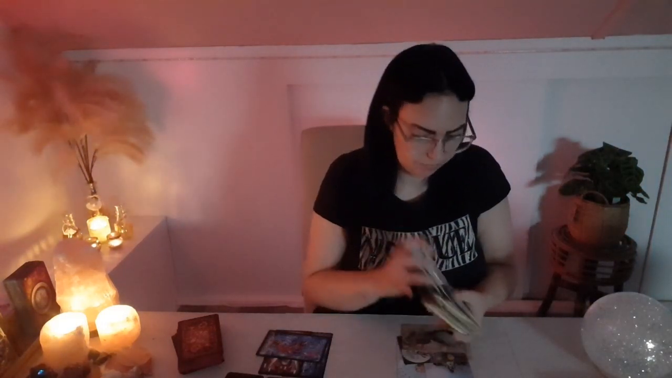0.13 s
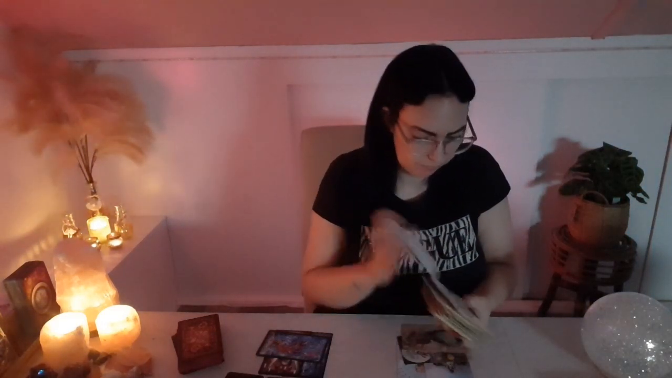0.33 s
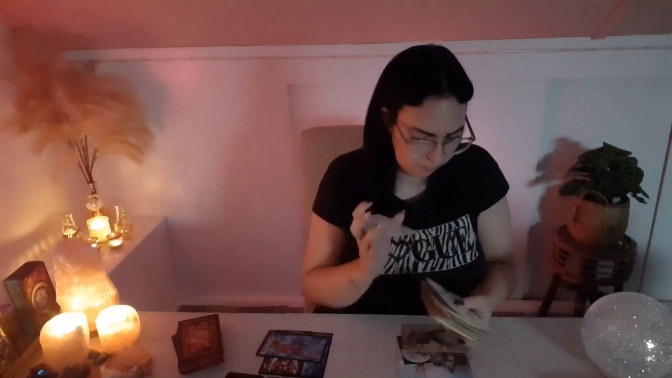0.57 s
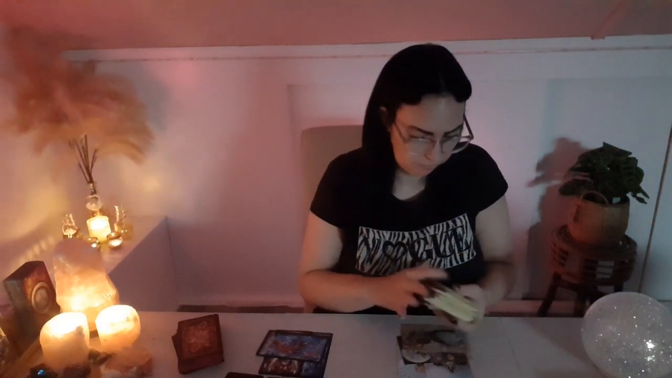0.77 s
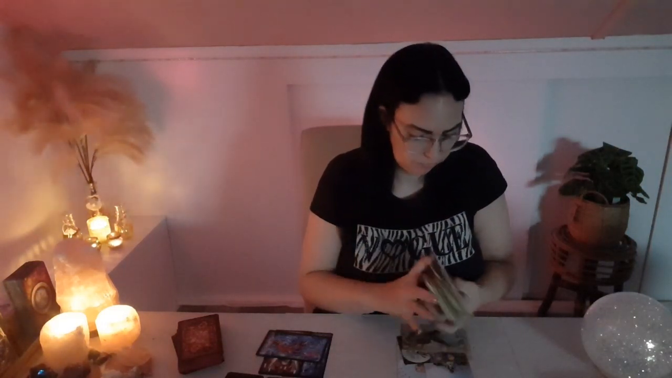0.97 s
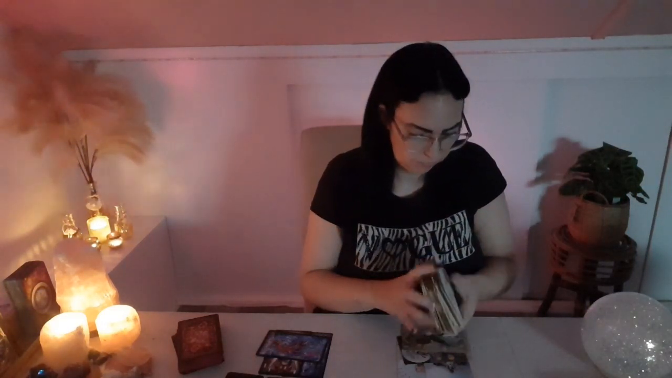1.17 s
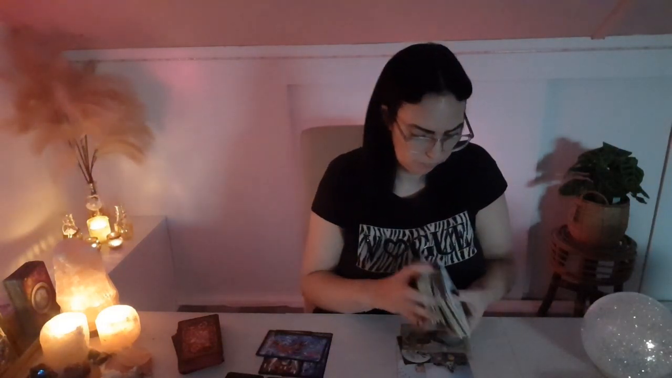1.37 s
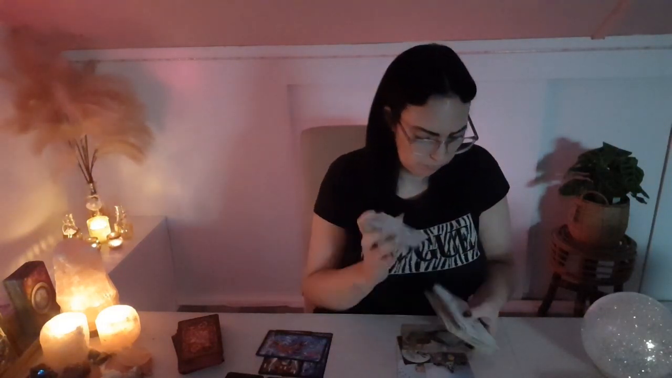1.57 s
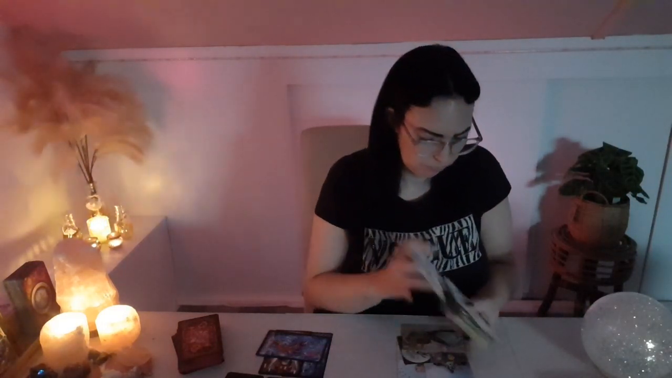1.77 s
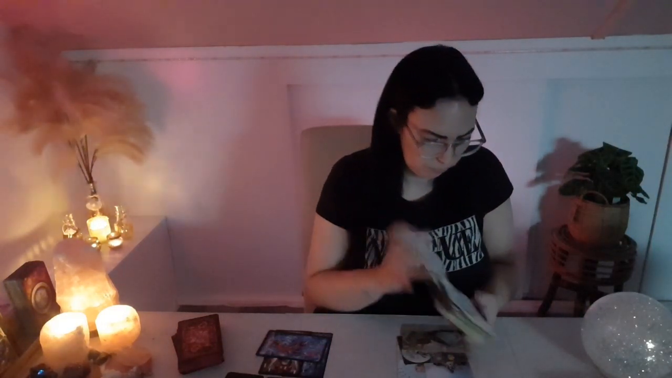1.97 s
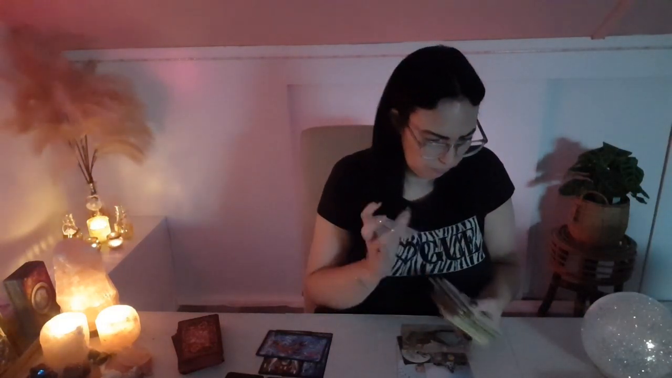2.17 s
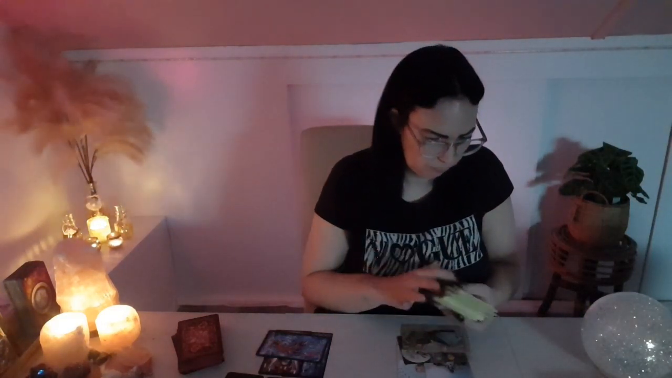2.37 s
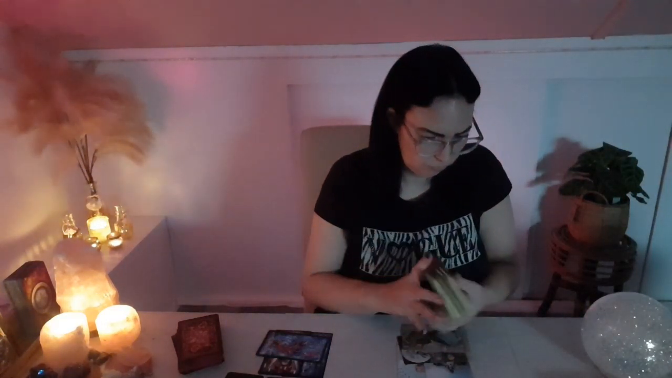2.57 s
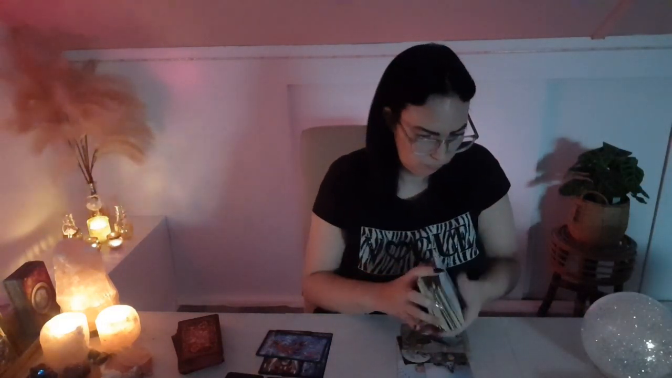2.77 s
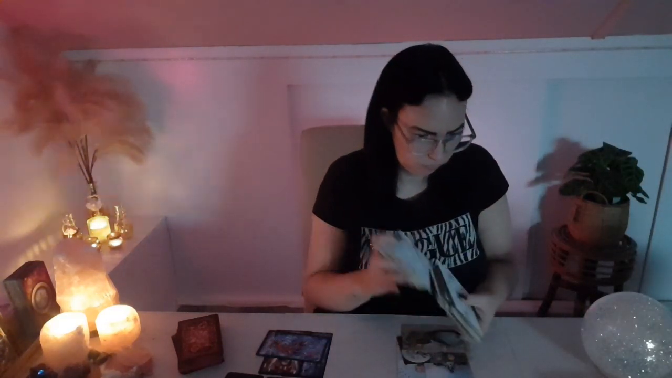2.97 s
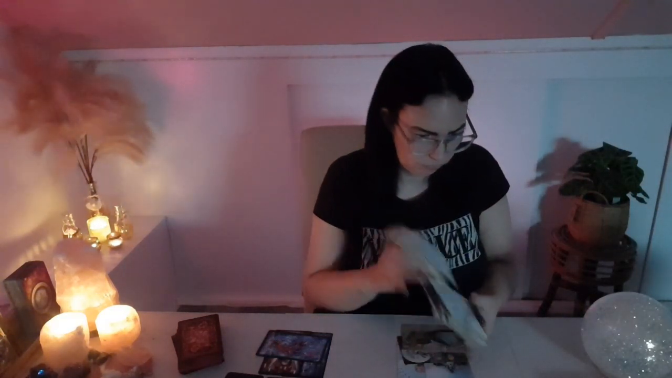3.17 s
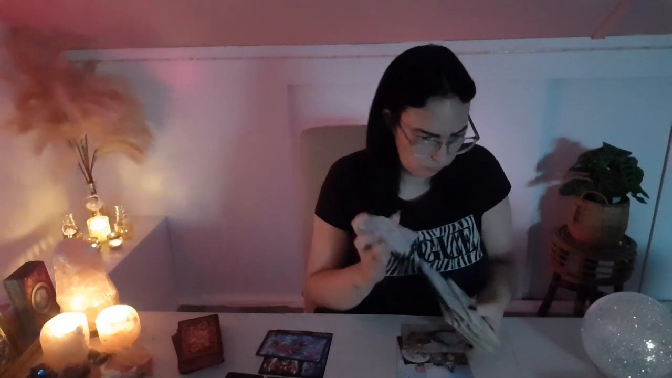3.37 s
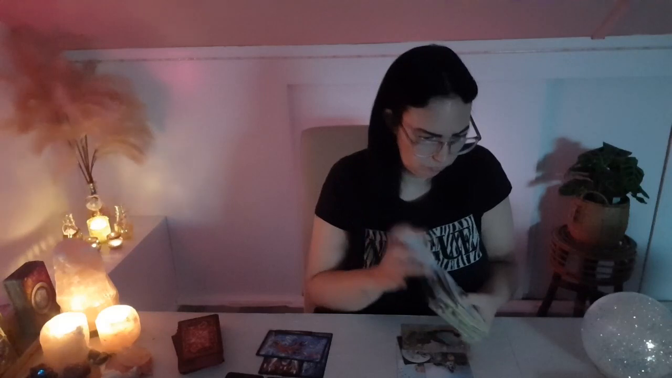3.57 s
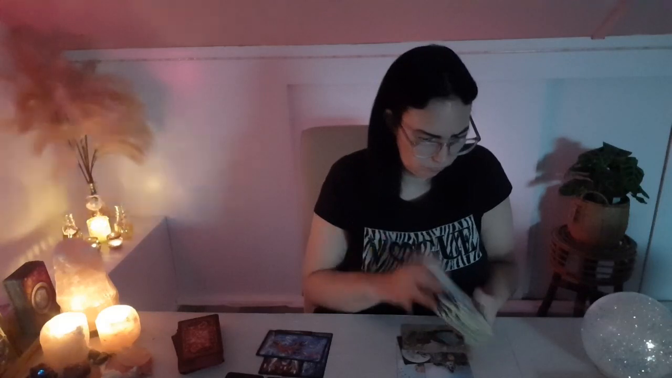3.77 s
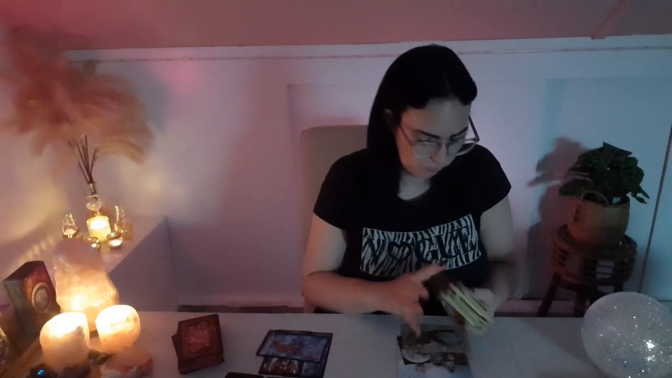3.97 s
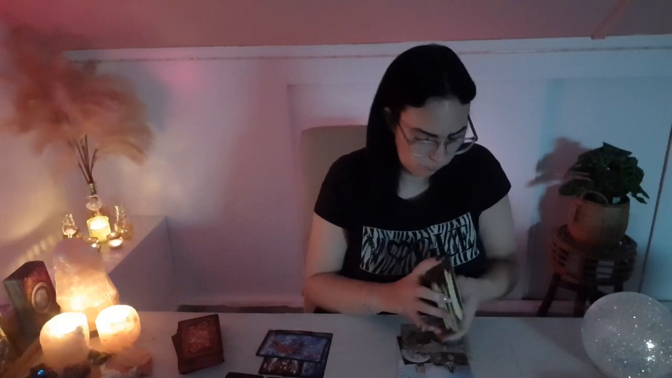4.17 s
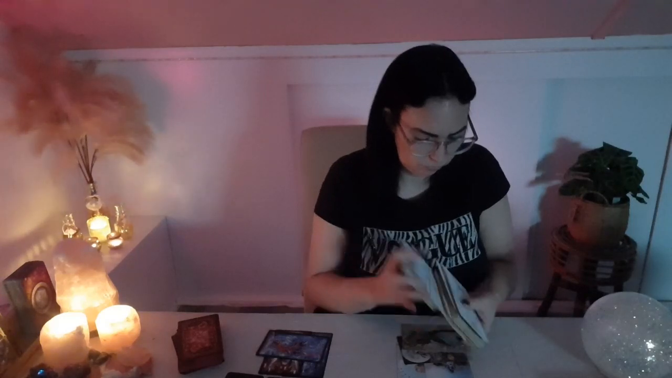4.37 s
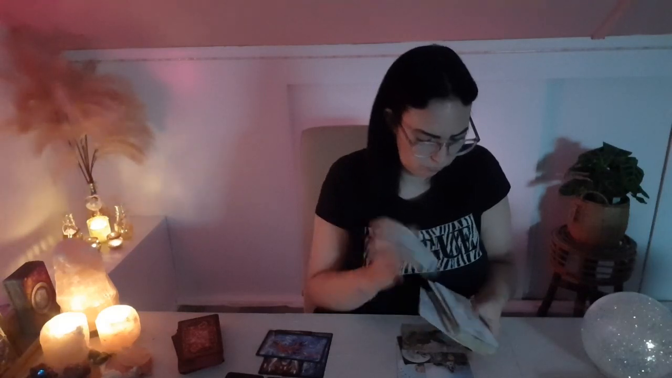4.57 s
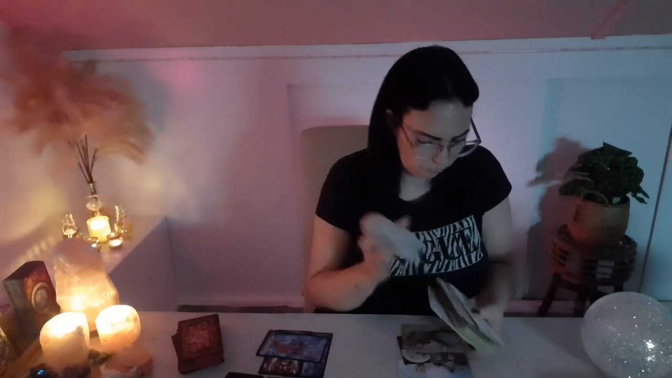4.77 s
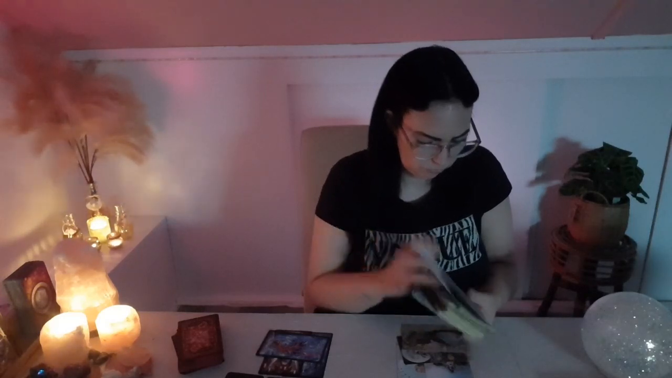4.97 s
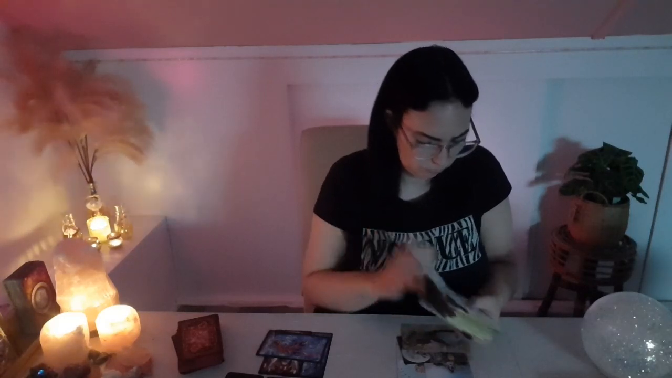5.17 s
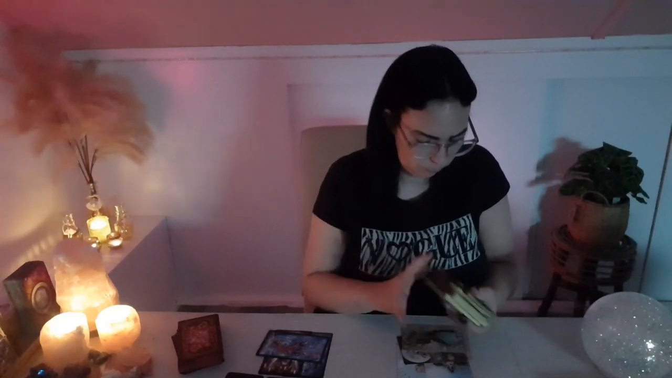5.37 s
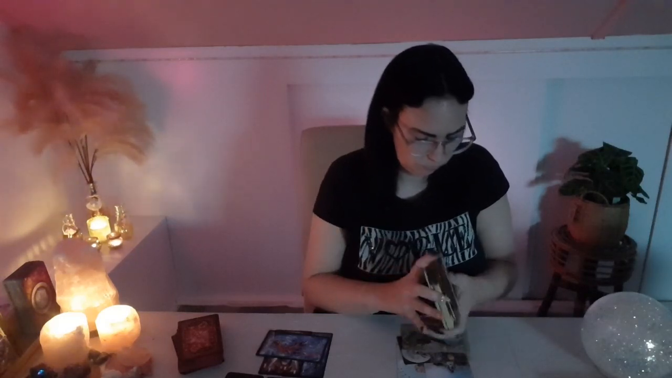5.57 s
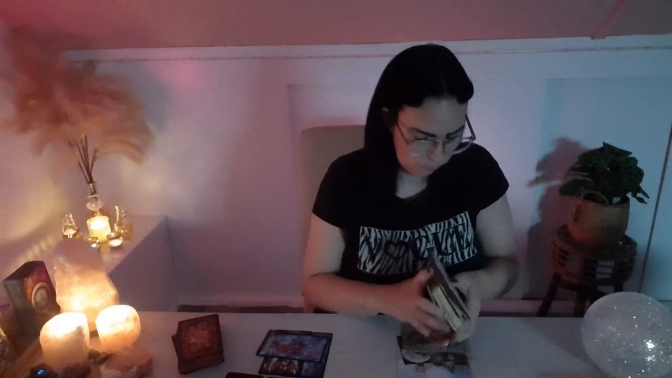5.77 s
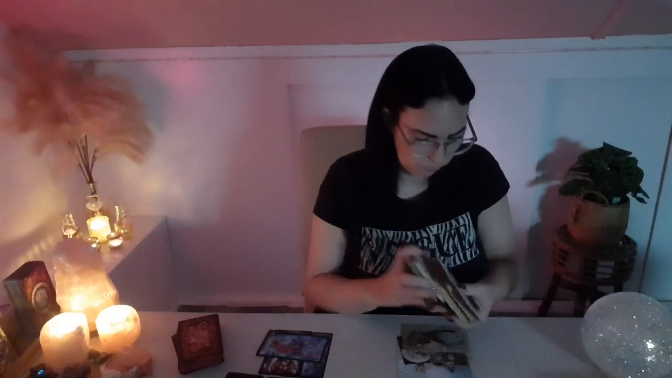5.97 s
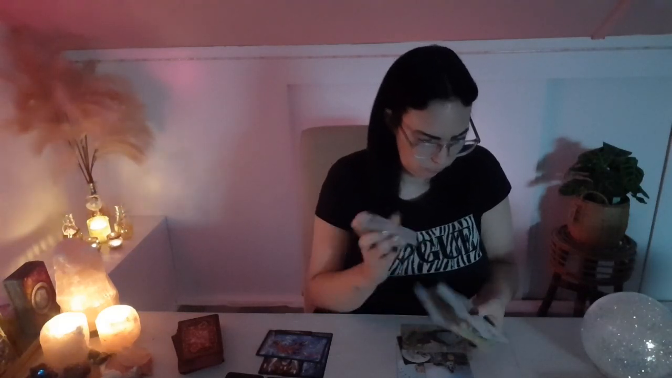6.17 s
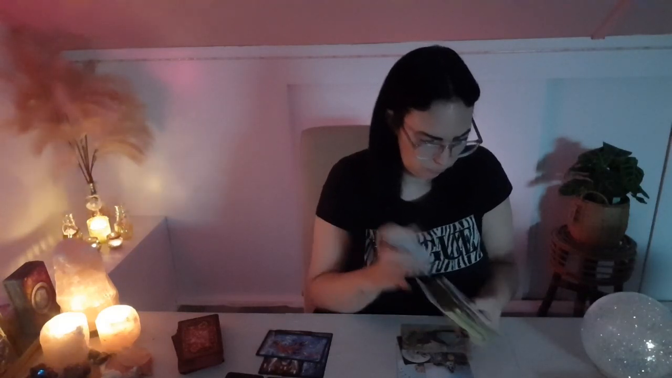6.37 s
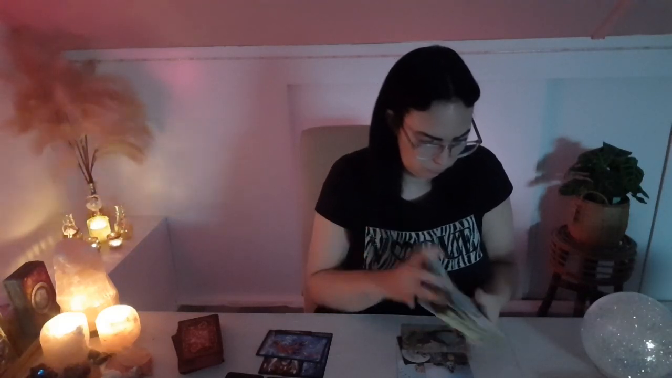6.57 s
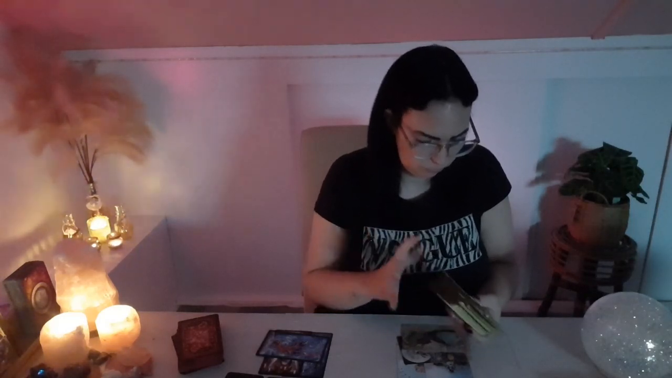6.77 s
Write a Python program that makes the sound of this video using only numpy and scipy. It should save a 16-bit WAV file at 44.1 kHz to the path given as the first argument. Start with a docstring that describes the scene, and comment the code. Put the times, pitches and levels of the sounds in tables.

```python
"""In a small, bare room a deck of large cards is shuffled overhand above a table.
Packets scrape off the deck (stick-slip catches and hiss) and slap down on the other hand (noise snaps, damped thuds).
Between rounds the fingers ease the deck apart with smooth hisses; flat landings make the cupped palm ring.
The table top and the walls throw every sound back to a pair of microphones, over a faint rumble, hiss and hum."""
import sys
import numpy as np
from scipy import signal
from scipy.fft import rfft, irfft, next_fast_len
from scipy.io import wavfile

SR = 44100
rng = np.random.default_rng(int(sys.argv[2]) if len(sys.argv) > 2 else 0)


def wrap_up_sound(samples):
    """Save the sound to the file named by the first command line argument, as 16-bit audio."""
    columns = np.atleast_2d(samples).T
    # keep every value between -1 and 1, then stretch to whole-number steps
    tamed = np.clip(columns, -1, 1)
    steps = np.round(tamed * 32767).astype(np.int16)
    wavfile.write(sys.argv[1], SR, steps)


N = 300321  # samples


def amp(db):
    """A level in decibels is twenty times the logarithm of the amplitude ratio; returns that ratio."""
    return 10 ** (np.asarray(db) / 20)


def evened(x):
    """Mean power sets the level of a sound: scales it to an rms of one."""
    return x / np.sqrt(np.mean(x ** 2) + 1e-20)


def read(points, hz):
    """Pitch follows the logarithm of frequency, so a table is interpolated on a logarithmic axis."""
    f, value = np.transpose(points)
    return np.interp(np.log(hz + 1), np.log(f + 1), value)


def add(mix, s, sound):
    """Superposition: sound pressures add, here from time s on."""
    part = mix[max(round(s * SR), 0):][:len(sound)]
    part += sound[:len(part)]


def colour(tone, tilt=0, size=2048):
    """Minimum phase: the log spectrum fixes the phase of a causal response, here of energy one."""
    hz = abs(np.fft.fftfreq(size, 1 / SR))
    # the tilt, in dB per octave, pivots at 3 kHz and stays level below 700 Hz
    octaves = np.log2(np.maximum(hz, 700) / 3000)
    log_gain = np.log(amp(read(tone, hz) + tilt * octaves))
    spectrum = np.exp(np.conj(signal.hilbert(log_gain)))
    response = np.fft.ifft(spectrum).real[:size // 2]
    return response / np.linalg.norm(response)


def tinted(x, tone, tilt=0):
    """Linear filtering: convolution with an impulse response gives a sound its spectrum."""
    return signal.fftconvolve(x, colour(tone, tilt))[:len(x)]


def pair(z, hz):
    """Coherence: two microphones hear most alike near 350 Hz, less in deep bass, hardly in the treble."""
    # left-right likeness of the field: hz, likeness
    likeness = [(100, 0.34), (350, 0.74), (700, 0.35), (1400, 0.03), (16000, 0.029)]
    same = np.clip(read(likeness, hz), -1, 1)[:, None]
    left = same * z[1] + np.sqrt(1 - same ** 2) * z[0]
    return np.array([left, z[1]])


def air(air_db=-73, hum_db=-77, hum_hz=78):
    """Stationary noise: shaped room rumble and hiss, with narrow-band modulation of a low hum."""
    # spectrum of the rumble and hiss, relative levels: hz, level_db
    air_tone = [(20, -15), (45, 8), (80, 5.5), (130, 0), (300, -4.5), (700, -7), (2000, -19), (7000, -15.5),
                (16000, -14.5)]
    hz, _, z = signal.stft(rng.standard_normal((2, N)), SR, nperseg=4096)
    shaped = pair(z, hz) * amp(read(air_tone, hz))[:, None]
    wash = signal.istft(shaped, SR, nperseg=4096)[1][:, :N]
    # noise below 6 Hz wavers the strength and phase of the hum
    slow = signal.butter(2, 6, fs=SR, output="sos")
    waver = evened(signal.sosfilt(slow, rng.standard_normal((2, N))))
    carrier = np.exp(2j * np.pi * hum_hz * np.arange(N) / SR)
    hum = ((1 + .5 * (waver[0] + 1j * waver[1])) * carrier).real
    return amp(air_db) * evened(wash) + amp(hum_db) * evened(hum)


def friction(count, catches_per_s, spread_db, smooth):
    """Stick-slip of paper on paper: tiny random catches of uneven size over a smooth hiss."""
    hiss, sign = rng.standard_normal((2, count))
    size = amp(spread_db * np.minimum(rng.exponential(1, count), 4))
    catches = sign * size * (rng.random(count) < catches_per_s / SR)
    return evened(evened(catches) + smooth * hiss)


def grip(t, step_s, count=300):
    """Friction between cards is never steady: it drifts to a new random value every step."""
    return evened(np.interp(t / step_s, np.arange(count), rng.uniform(-0.9, 1, count)))


def scrapes(touch_s=.011, release_s=0.012, bite_db=7, bite_s=0.0062, grip_db=2.0, grip_s=0.00713):
    """Friction-driven vibration: a packet touches, bites, rubs harder and slides free while its cards flex."""
    # a packet scrapes over the deck, relative levels:
    # start_s, rise_s, fall_s, level_db, brightness_db_per_octave, flex_db
    strokes = [ (0.000, 0.001, 0.005, -58.5, -2, -3.5), (0.139, 0.032, 0.085, -46.5, 0, -9),
               (0.419, 0.014, 0.038, -43, .5, -8), (0.474, 0.033, 0.073, -45.5, -.5, -5),
               (0.560, 0.036, .015, -43.5, 0, -25), (0.737, 0.0041, 0.067, -46.5, -2, -7),
               (1.562, 0.0033, 0.013, -38.5, -5, -33), (1.782, 0.019, 0.069, -36.5, -1.5, -17.5),
               (2.095, 0.0055, .025, -45.5, 1.5, -18), (2.124, 0.017, .008, -40.5, 3, -18.5),
               (2.350, 0.053, 0.027, -48.5, -1.5, -3), (3.293, 0.024, 0.074, -40.5, -2, -21.5),
               (3.570, 0.0016, 0.015, -41, 2.5, -19), (3.603, 0.033, 0.015, -41, 0, -13.5),
               (3.830, 0.0027, 0.012, -50, 0.5, -13), (3.874, 0.0053, 0.034, -51.5, 0.5, -7),
               (4.212, 0.0086, 0.047, -50, 1, -19.5), (4.514, 0.0046, 0.022, -51.5, -3, -9),
               (4.715, 0.0066, 0.014, -40, 2, -18), (4.748, 0.041, 0.017, -45, -.5, -8),
               (4.990, 0.0022, .028, -48.5, 1, -16.5), (5.026, 0.01, 0.0089, -40.5, 4.5, -24),
               (5.084, 0.0045, 0.019, -50, -2.5, -1.5), (5.254, 0.0094, 0.0097, -43, -1.5, -5),
               (5.282, 0.015, 0.033, -46, -1.5, -8.5), (6.125, 0.015, 0.036, -47, 4, -15.5),
               (6.375, 0.028, 0.097, -38.5, -1, -7), (6.650, 0.015, 0.09, -40, -1, -9)]
    # spectrum of the rubbing edges, relative levels: hz, level_db
    scrape_tone = [(100, -39.5), (400, -12), (800, -2), (1150, -4.5), (1500, 1), (2100, 0.5), (2900, -1),
                   (4200, 2), (7000, -3.5), (12000, -0.5), (16000, -9.5)]
    # spectrum of the flexing cards, relative levels: hz, level_db
    flex_tone = [(40, -31), (90, -10.5), (180, -10), (300, -1.5), (480, 1), (700, 0), (1000, -7.5),
                 (2000, -29)]
    out, t = np.zeros(N), np.arange(SR // 5) / SR - touch_s
    for s, rise, fall, db, tilt, flex_db in strokes:
        # light touch, start, hardest rub, easing off, free
        times = [-touch_s, 0, rise, rise + fall, rise + fall + release_s]
        stroke_db = np.interp(t, times, [-23, -5.5, 0, -11.5, -60])
        catch_db = bite_db * np.exp(-abs(t) / bite_s)  # the edges catch at the start
        level = amp(db + stroke_db + catch_db + grip_db * grip(t, grip_s))
        rub = level * friction(len(t), catches_per_s=1500, spread_db=4.5, smooth=.55)
        flex = tinted(level * rng.standard_normal(len(t)), flex_tone)
        add(out, s - touch_s, tinted(rub, scrape_tone, tilt) + amp(flex_db) * flex)
    return out


def slaps(snap_s=0.0011, snap_db=23, thud_db=24, straggle_s=0.0021, straggle_db=-6, beam_db=7):
    """Impact: edges snap down as a short noise burst, the palm thuds; returns sound all round and ahead."""
    # a card edge or a packet lands, relative levels:
    # start_s, snap_db, brightness_db_per_octave, thud_db, thud_hz
    landings = [ (0.143, -38.5, -.5, -62, 590), (0.241, -51.5, -7, -54.5, 666), (0.5505, -50, -6, -56, 637),
                (0.557, -28, -.5, -38.5, 594), (0.740, -38.5, -2.5, -44, 600), (1.563, -41.5, -6, -56, 600),
                (1.7689, -39.5, -3.5, -72, 930), (1.7915, -32.5, 0, -67, 594), (1.822, -38.5, 12, -59, 590),
                (1.865, -44.5, -11, -48.5, 384), (2.166, -51.5, -10, -45.5, 355),
                (2.346, -48, 7, -44.5, 294), (2.387, -52, 1, -77, 252), (3.0701, -46, -3.5, -44.5, 430),
                (3.2854, -35, 1.5, -40, 870), (3.322, -47, 3, -50, 663), (3.41, -46.5, -5, -70, 800),
                (3.6493, -37.5, -4, -40, 480), (3.8727, -45.5, -2.5, -55, 610),
                (4.2143, -46, 0.5, -61.5, 510), (4.5167, -35, 3, -49, 720), (4.7428, -34.5, -0.5, -47, 627),
                (4.7955, -43.5, -4.5, -49, 507), (5.039, -48.5, -4.5, -49.5, 750),
                (5.083, -42.5, -1.5, -47.5, 553), (5.2611, -36, -1.5, -44.5, 310),
                (6.1588, -40.5, 0, -40.5, 486), (6.3795, -24.5, 1, -28, 616), (6.642, -36, -1, -53, 567),
                (6.653, -34.5, -2, -43.5, 535), (6.7266, -54, -16, -49, 625)]
    # spectrum of a snap, relative levels: hz, level_db
    snap_tone = [(30, -23), (130, -12.5), (400, -28), (1000, -10), (1600, -0.5), (2800, -0.5), (4300, 2),
                 (7000, 1), (12000, -0.5), (16000, -12)]
    around, ahead, t = np.zeros(N), np.zeros(N), np.arange(2048) / SR
    thud_cycles = .76  # sets how soon the thud dies away
    fade = np.exp(-t / snap_s)
    for s, db, tilt, low_db, hz in landings:
        edges = rfft(rng.standard_normal(len(t)) * fade)
        # many edges together cover all frequencies evenly
        edges = evened(irfft(edges / abs(edges)) * np.sqrt(fade))
        # loose cards trail behind the rest
        stragglers = evened(rng.standard_normal(len(t)) * np.exp(-t / straggle_s))
        snap = tinted(edges + amp(straggle_db) * stragglers, snap_tone, tilt)
        swell_and_decay = t * np.exp(-2 * t * hz / thud_cycles)
        thud = np.diff(np.sin(2 * np.pi * hz * t) * swell_and_decay, prepend=0)
        snap *= amp(db + snap_db) / np.linalg.norm(snap)
        thud *= amp(low_db + thud_db) / np.linalg.norm(thud)
        add(around, s, snap + thud)
        # flat cards beam the snap towards the microphones; the thud spreads evenly
        add(ahead, s, amp(beam_db) * snap + thud)
    return around, ahead


def glides(swell_db=14, ease=0.25, hiss_db=2, press_db=0, grip_db=2.0, grip_s=0.0168):
    """Sliding friction grows with speed: card faces hiss smoothly, and pressure brings out lower tones."""
    # cards glide as the deck is parted, relative levels, pressure as level of the lower tones:
    # fastest_s, speeding_up_s, slowing_down_s, level_db, pressure_db
    slides = [ (1.122, .085, .05, -53.5, -8), (1.225, .05, .15, -69, -16), (1.44, .05, .08, -59.5, -6.5),
              (1.525, 0.061, 0.071, -55.5, -11.5), (2.736, 0.095, 0.076, -56.5, -10.5),
              (2.90, 0.084, 0.086, -66.5, -10), (2.962, .025, 0.037, -51.5, -8.5),
              (3.045, 0.029, 0.041, -53, -4), (4.082, .012, .09, -68, -0.5), (4.19, .12, .07, -59, -11),
              (4.50, .21, .03, -57.5, -35), (5.575, 0.08, 0.14, -61, -13.5),
              (5.78, 0.092, 0.054, -59.5, -10), (5.845, .02, 0.11, -68, -7), (6.101, 0.25, 0.047, -70, -15)]
    # spectrum of the thin hiss, relative levels: hz, level_db
    glide_tone = [(300, -12.5), (1500, -24), (3000, -14.5), (4400, -4), (7500, -3.5), (12000, 0),
                  (16000, -9)]
    # spectrum of the lower tones, relative levels: hz, level_db
    press_tone = [(100, -11), (300, -31), (650, -6), (1100, -9), (1520, 2.5), (1750, -2.5), (2100, 2),
                  (2700, 4), (4000, -0.5), (8000, -57.5)]
    out = np.zeros(N)
    for s, rise, fall, db, pressure_db in slides:
        t = np.arange(0, rise + fall, 1 / SR)
        speed = np.interp(t, [0, rise, rise + fall], [0, 1, 0])
        level = amp(db + swell_db * (speed - 1) + grip_db * grip(t, grip_s))
        level = level * np.minimum(speed / ease, 1)  # fades to silence at the slow ends
        rub = level * friction(len(t), catches_per_s=900, spread_db=5, smooth=1.1)
        hiss = amp(hiss_db) * tinted(rub, glide_tone)
        add(out, s - rise, hiss + amp(press_db + pressure_db) * tinted(rub, press_tone))
    return out


def claps(ring_db=24):
    """Cavity resonance: a packet lands flat and the air in the cupped palm rings as a damped sine."""
    # ringing of the palm, relative levels: start_s, level_db, pitch_hz, t60_s
    hollows = [(1.5625, -48, 815, 0.03), (2.1680, -55.5, 374, 0.063), (6.3790, -27, 684.4, 0.13),
               (6.6535, -48, 592, 0.023)]
    out, t = np.zeros(N), np.arange(4096) / SR
    for s, db, hz, t60 in hollows:
        hollow = np.diff(np.sin(2 * np.pi * hz * t) * amp(-60 * t / t60), prepend=0)
        add(out, s, amp(db + ring_db) * hollow / np.linalg.norm(hollow))
    return out


def ring(x, modes):
    """Modal resonance: each mode adds a damped response to the sound that drives it."""
    out = x
    for hz, width, db in modes:
        b, a = signal.iirpeak(hz, hz / width, SR)
        out = out + amp(db) * signal.lfilter(b, a, x)
    return out


def near(x, direct_db=-9, right_lag_s=.00007, sway_s=0.00016):
    """Path lengths set arrival times: direct sound and first echoes shift a little as the hands move."""
    # first echoes, from the table top on: delay_s, left_gain, right_gain
    echoes = [(.0031, 0.57, 0.58), (.0037, 0.23, 0.13), (.0073, 0.22, 0.36), (.0092, 0.18, 0.19)]
    n, out = np.arange(N), np.zeros((2, N))
    poses = np.linspace(0, N, num=24)  # the hands drift between random poses
    for delay, left, right in [(0.00022, 0.98, 1)] + echoes:  # direct sound first
        path = np.interp(n, poses, rng.standard_normal(len(poses)))
        angle = np.interp(n, poses, rng.standard_normal(len(poses)))
        late = delay + sway_s * path
        for side, gain, lag in [(0, left, late), (1, right, late + right_lag_s * (1 + angle))]:
            source = n - np.round(lag * SR).astype(int)
            out[side] += gain * x[np.clip(source, 0, N - 1)]
    return amp(direct_db) * out


def wall_tail(build_s=0.0044, count=28000):
    """Reverberation: dense reflections build up, then decay exponentially at each band's own rate."""
    # reverberation time of the room: hz, t60_s
    decay = [(100, 0.37), (400, 0.27), (1000, 0.41), (2000, 0.38), (7000, 0.34), (16000, 0.23)]
    taps = rng.choice([-1., 1.], (2, count)) * (rng.random(count) < 9000 / SR)  # 9000 a second on average
    hz, t, z = signal.stft(taps, SR, nperseg=256)
    fading = pair(z, hz) * amp(-60 * t / read(decay, hz)[:, None])
    tail = signal.istft(fading, SR, nperseg=256)[1][:, :count]
    tail *= np.sqrt(1 - np.exp(-np.arange(count) / SR / build_s))
    return tail / np.linalg.norm(tail, axis=1, keepdims=True)


def room(x, tail_db=-2, count=5):
    """Impulse responses depend on source place: the moving cards cross-fade between several wall tails."""
    # standing waves between the walls and the table, relative levels: pitch_hz, width_hz, level_db
    standing_waves = [(152, 53, 3), (295, 21.5, 3.5), (378.7, 10, 5), (654, 31, -7.5)]
    place = np.arange(N) / SR * 60  # 60 places a second, taken in turn
    out = np.zeros((2, N))
    for k in range(count):
        distance = np.minimum(abs((place - k) % count - count / 2), 1)
        share = x * np.cos(np.pi / 2 * distance)
        out += signal.oaconvolve(share[None], wall_tail(), axes=1)[:, :N]
    return amp(tail_db) * ring(out, standing_waves)


def scene():
    """Superposition of direct, reflected and background sound from the cards in the room."""
    # the held deck rings briefly, relative levels: pitch_hz, width_hz, level_db
    deck = [(1487, 100, 3.5), (2020, 143, -3)]
    cards = scrapes() + glides() + claps()
    around, ahead = slaps()
    return near(ring(cards + ahead, deck)) + room(ring(cards + around, deck)) + air()


def record(dry):
    """Transducer response: the microphones dip in the treble, the right is louder, and the band is limited."""
    # microphone response: hz, level_db
    mic_tone = [(20, -5), (7900, 2), (8500, -10.5), (9500, -7.5), (11300, -2), (15800, 4), (16300, -41.5)]
    # balance of the two microphones: hz, left_minus_right_db
    mic_balance = [(60, -4), (300, -4.5), (1500, -3), (5000, -3), (13000, -5.5)]
    size = 2 * next_fast_len(N // 2 + 4096)
    hz = np.fft.rfftfreq(size, 1 / SR)
    sides = np.array([[.5], [-.5]])
    gain = amp(read(mic_tone, hz) + sides * read(mic_balance, hz))
    heard = irfft(rfft(dry, size) * gain)[:, :N]
    low_pass = signal.firwin(511, 16500, window=("kaiser", 9), fs=SR)  # Hz
    return signal.oaconvolve(heard, low_pass[None], "same")


dry = scene()
out = record(dry)
wrap_up_sound(out)
```